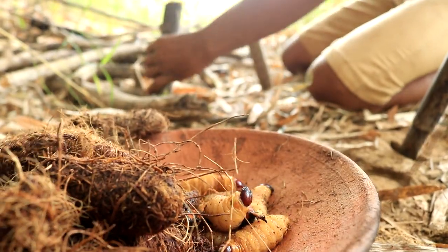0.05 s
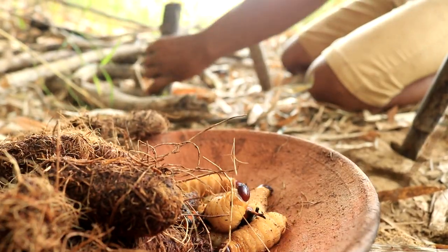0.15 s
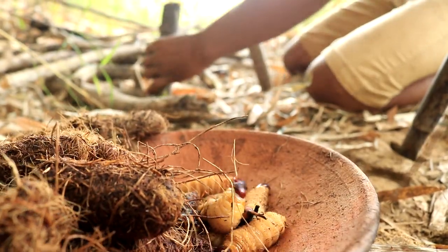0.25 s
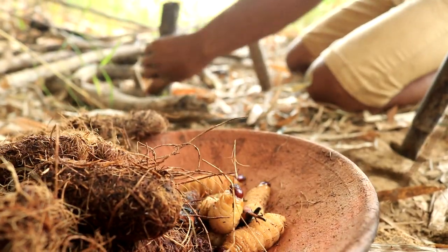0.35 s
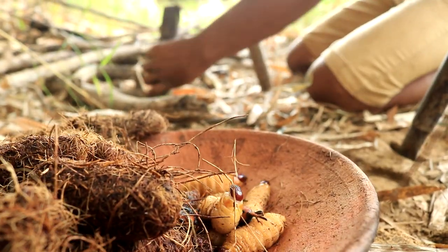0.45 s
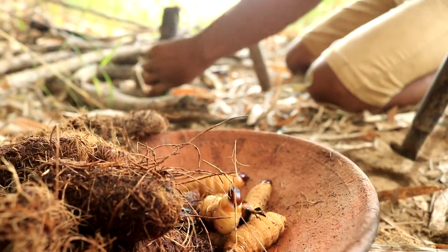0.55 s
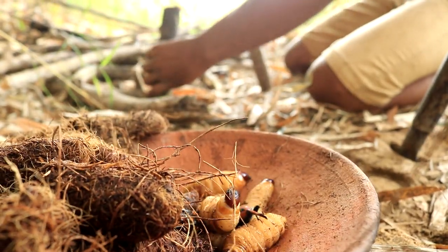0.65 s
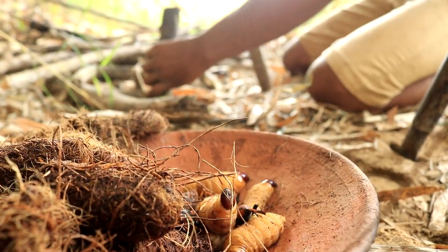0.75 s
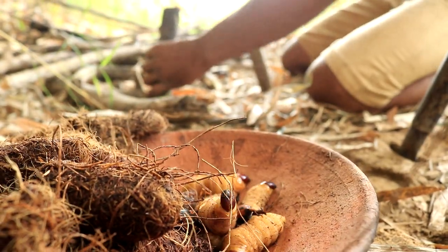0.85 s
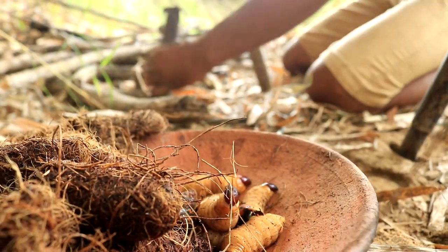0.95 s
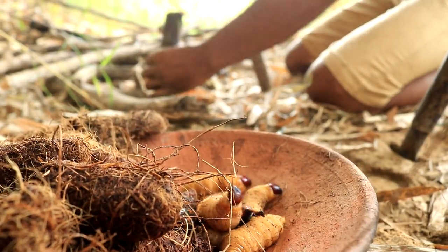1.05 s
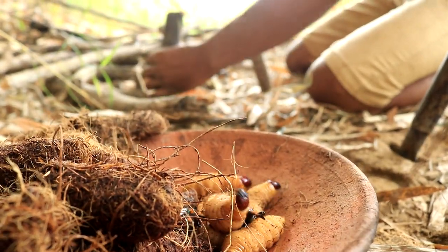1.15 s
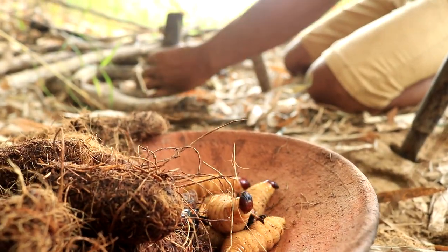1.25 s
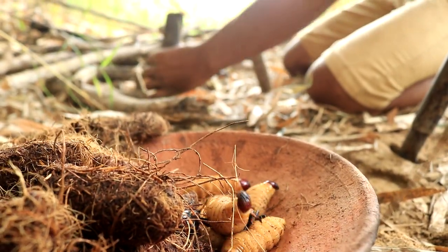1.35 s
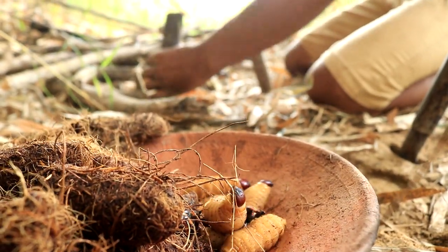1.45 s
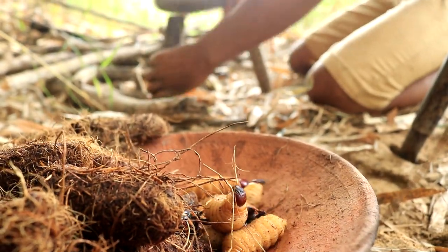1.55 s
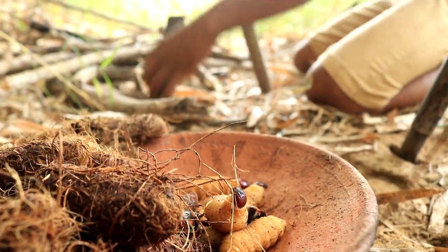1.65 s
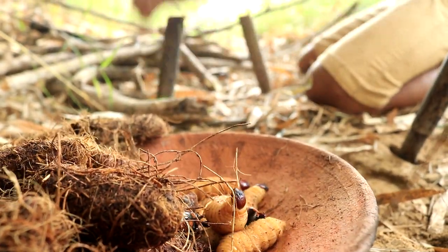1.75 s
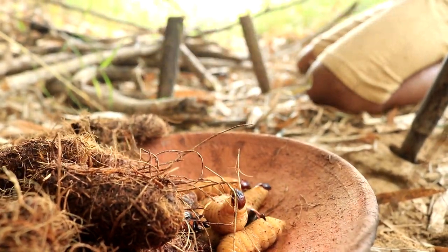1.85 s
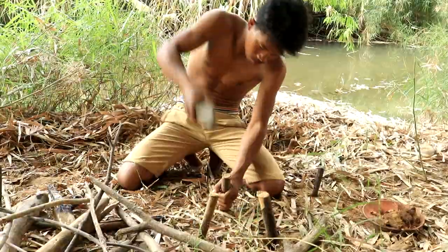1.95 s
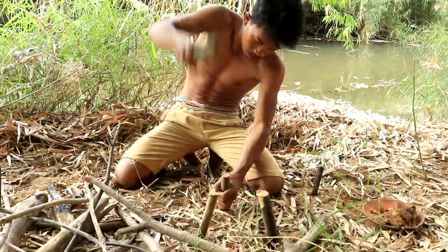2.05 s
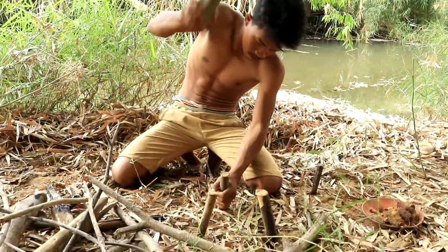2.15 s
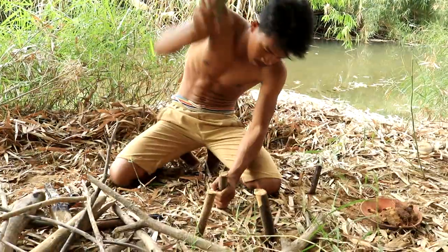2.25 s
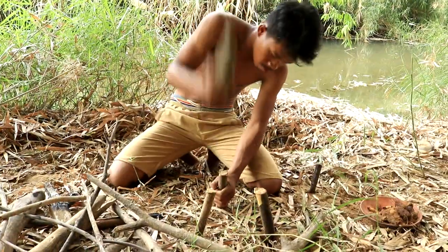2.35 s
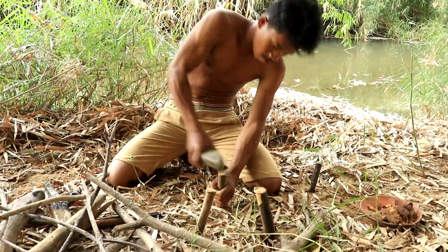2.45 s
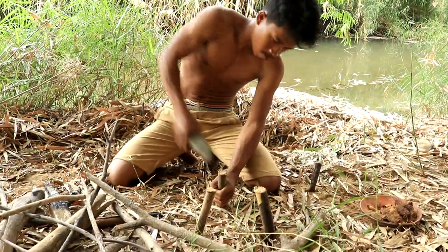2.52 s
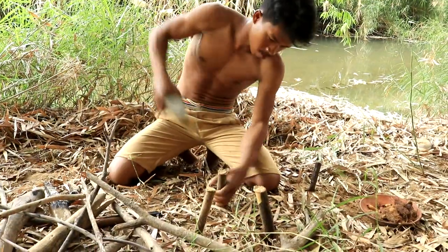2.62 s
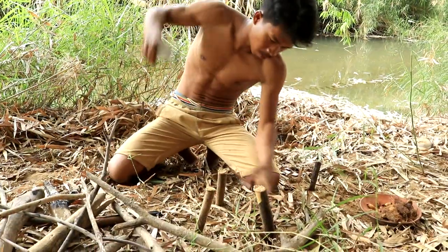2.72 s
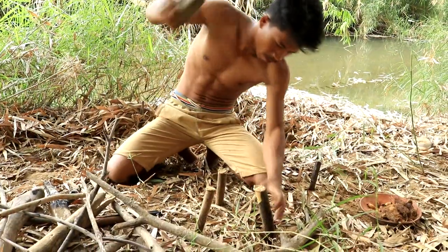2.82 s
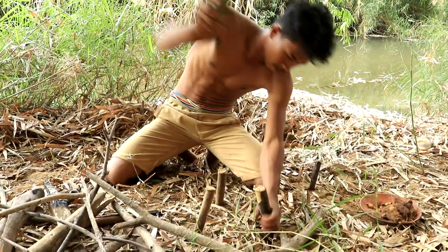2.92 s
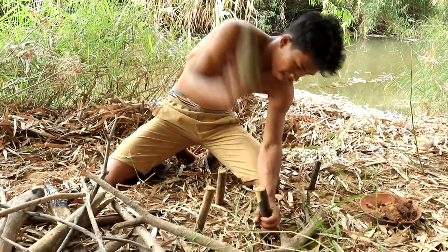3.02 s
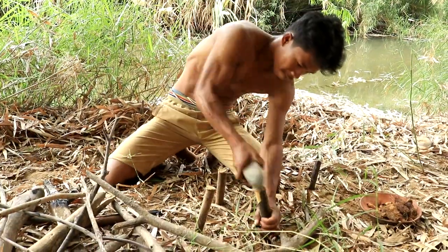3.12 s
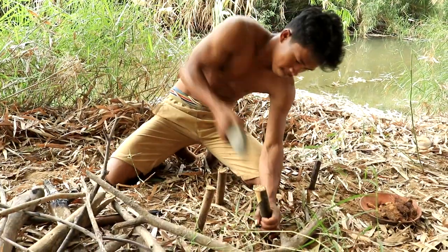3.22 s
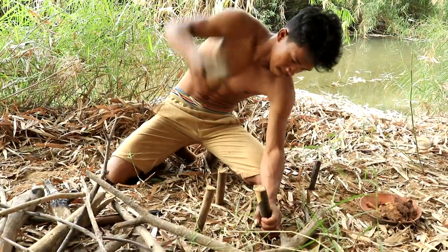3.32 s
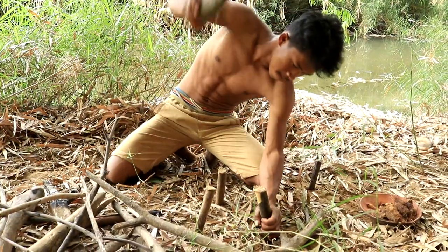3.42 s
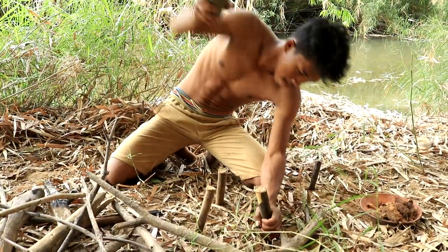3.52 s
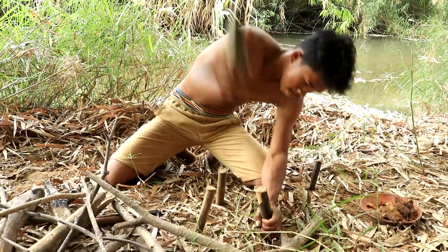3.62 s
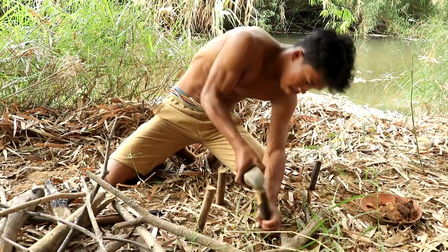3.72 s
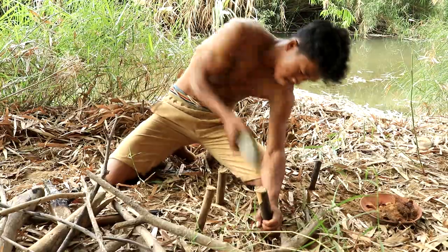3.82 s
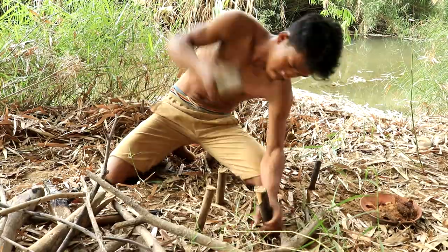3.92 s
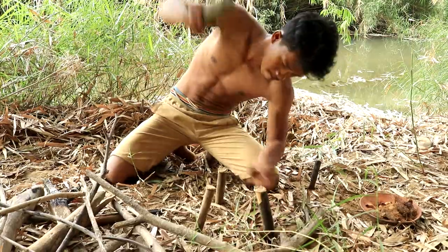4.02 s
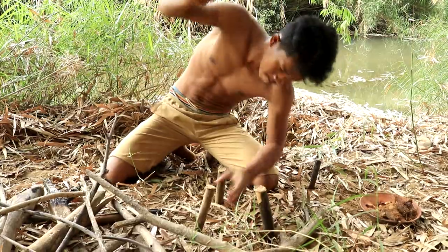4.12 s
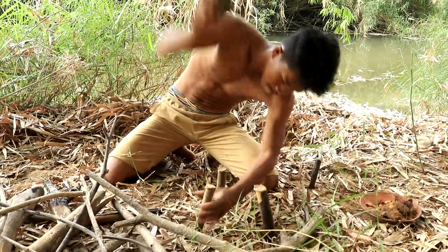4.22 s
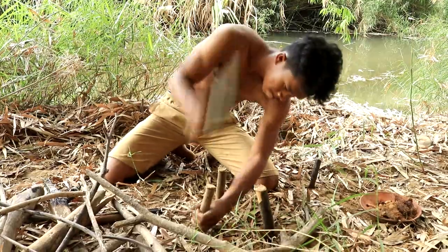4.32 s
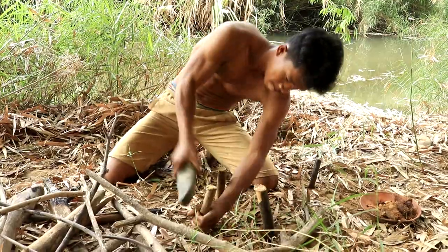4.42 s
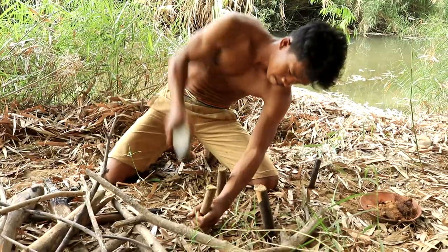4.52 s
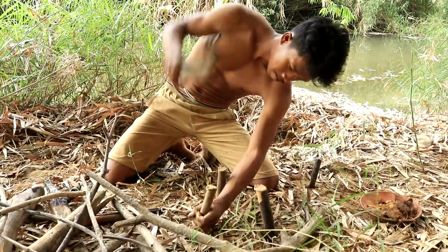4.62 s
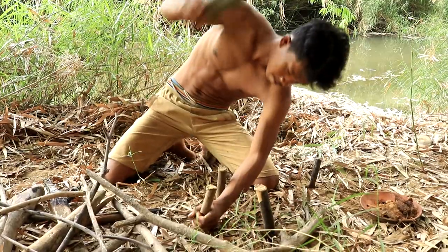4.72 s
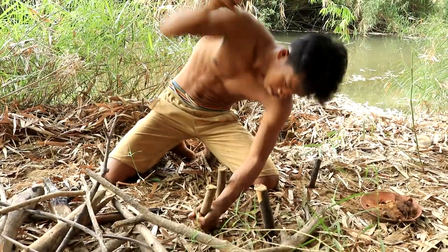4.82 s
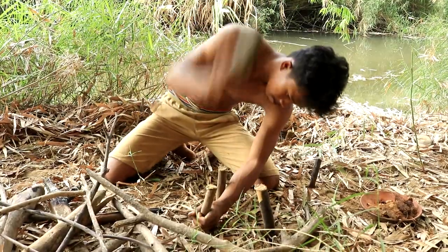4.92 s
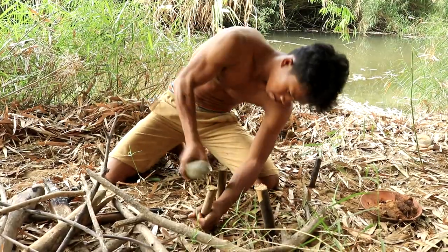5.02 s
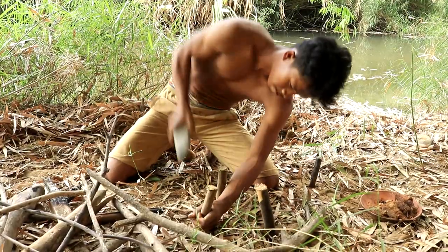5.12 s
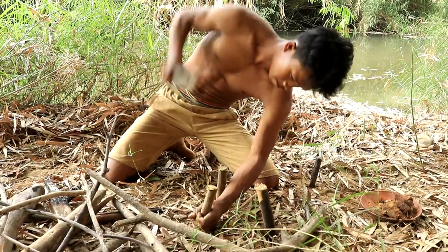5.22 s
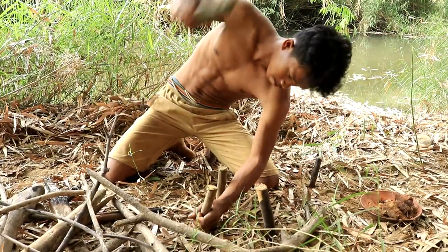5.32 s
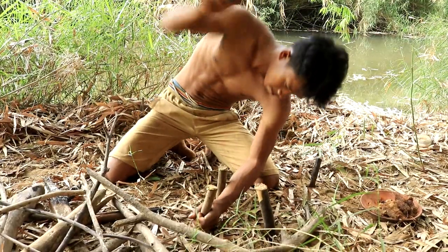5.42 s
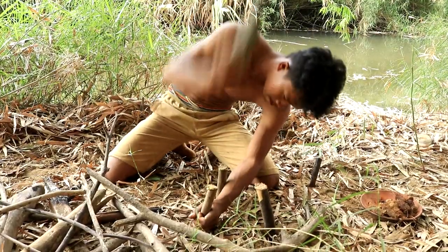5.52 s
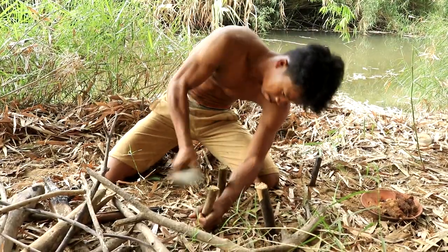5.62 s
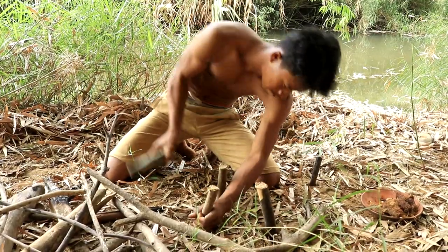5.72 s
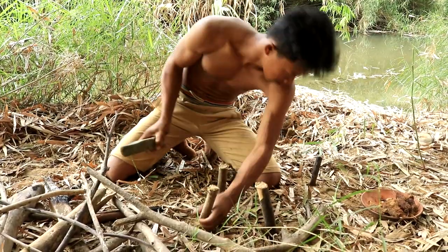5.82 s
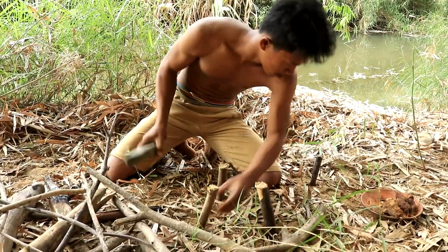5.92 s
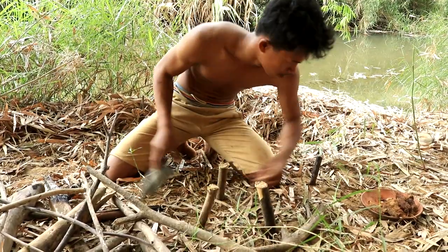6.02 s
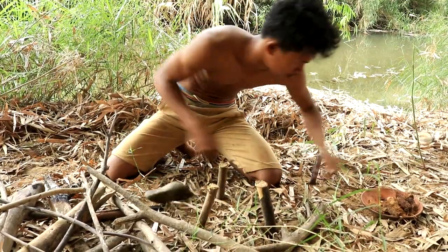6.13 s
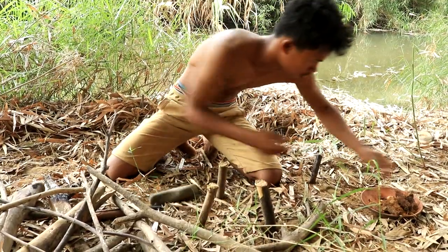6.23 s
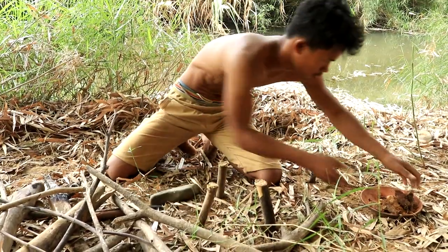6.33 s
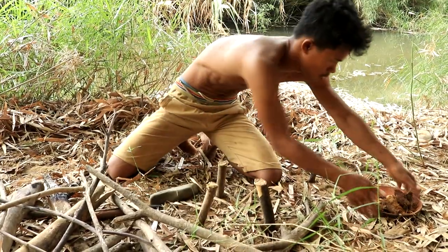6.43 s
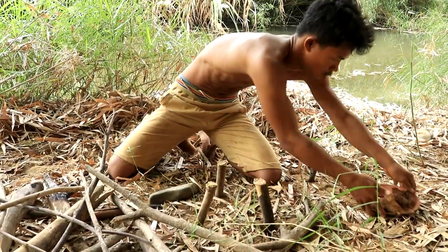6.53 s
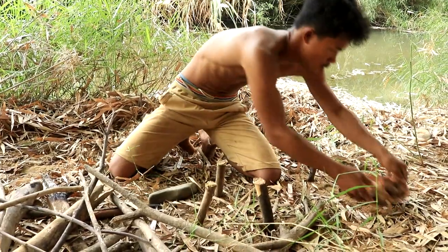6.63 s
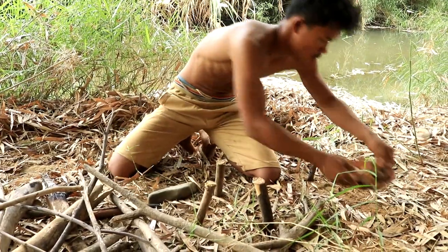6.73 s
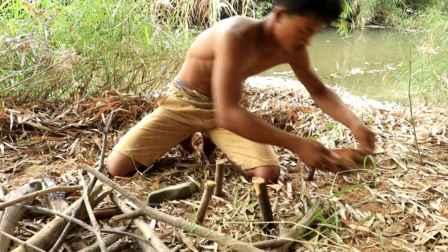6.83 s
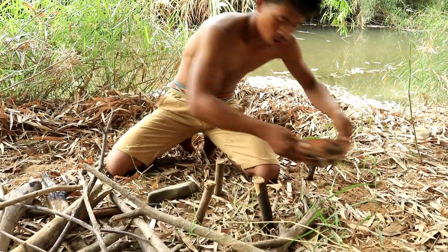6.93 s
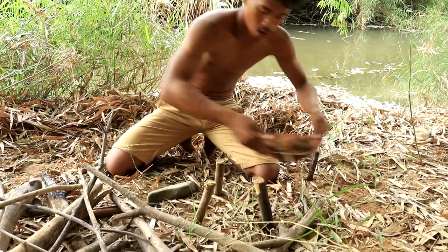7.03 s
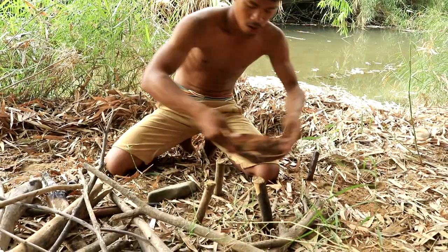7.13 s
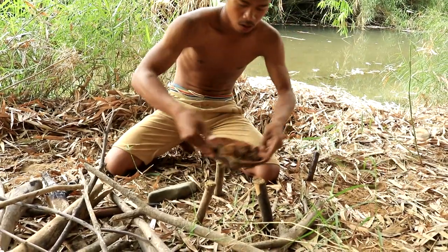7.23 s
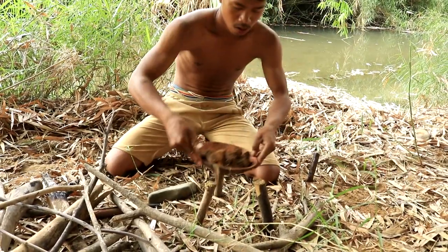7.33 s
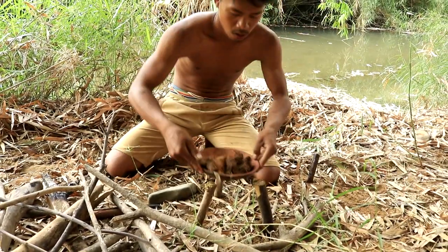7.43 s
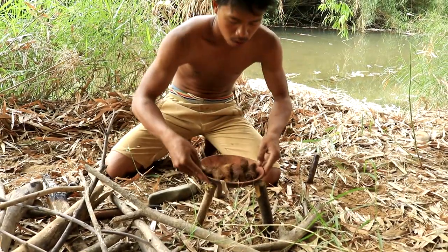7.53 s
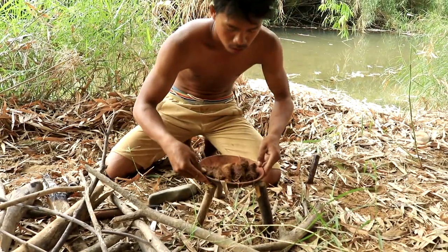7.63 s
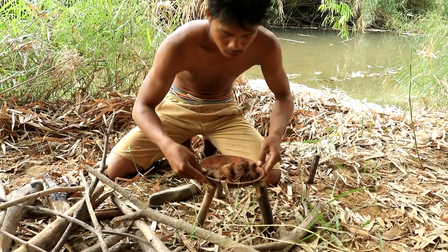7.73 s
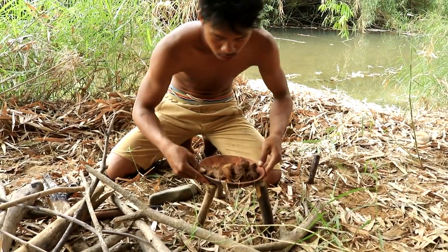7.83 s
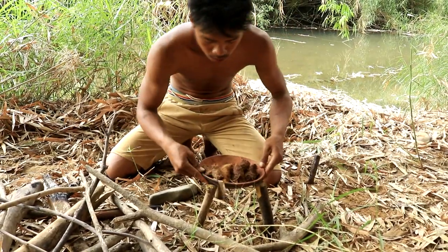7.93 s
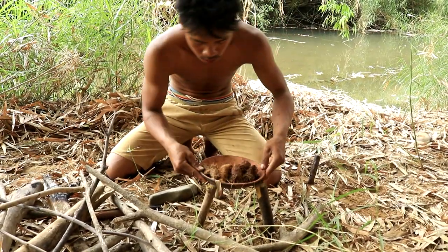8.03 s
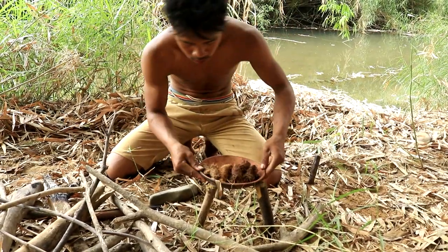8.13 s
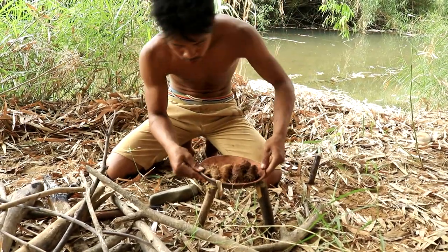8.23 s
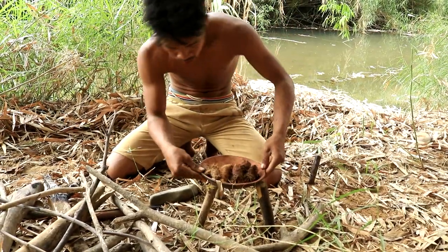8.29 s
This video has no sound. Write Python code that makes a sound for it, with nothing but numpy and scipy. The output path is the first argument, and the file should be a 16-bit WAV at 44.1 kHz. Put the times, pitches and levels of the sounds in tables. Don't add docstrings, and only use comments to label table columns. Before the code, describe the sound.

Nine heavy stone blows on wooden stakes, very close and distorted, with leaf crackle, cricket drone, and finally a clay bowl scraping on wood.

```python
import sys
import numpy as np
from scipy import signal
from scipy.io import wavfile

SR = 44100
rng = np.random.default_rng(int(sys.argv[2]) if len(sys.argv) > 2 else 0)


def volts(x):
    e = np.asarray(x, float) / 20
    return 10 ** e


def bounce(signal):
    frames = np.transpose(np.atleast_2d(signal))
    limited = np.clip(frames, -1, 1)
    pcm = np.round(limited * 32767).astype(np.int16)
    wavfile.write(sys.argv[1], SR, pcm)


N = 368676

# f/Hz, correlation
LIKENESS = [(60, 1), (180, 0.63), (550, 0.35), (1650, 0.27), (4970, 0.077), (15000, -0.27)]
# f/Hz, density/dB per Hz
HUSH_COLOUR = [(200, -33), (300, -11.5), (500, -14), (900, -18.5), (1500, -17.5), (2500, -22.5),
               (4000, -23), (5200, -49), (6500, -25.5), (8500, -16), (11000, -29), (14000, -39),
               (16000, -40)]
# f/Hz, density/dB per Hz
RUMBLE_COLOUR = [(22, -1), (35, -10.5), (55, 3), (75, -2.5), (105, -0.5), (150, -10.5), (220, -13)]
RUMBLE_DB = -37.5, -41
# t/s, length/s, level/dB, start f/Hz
BIRD = [
    (6.6, 0.19, -47, 1580),
    (6.793, 0.12, -47, 1400),
    (7.425, 0.18, -47.5, 1300),
]
# f/Hz, width/Hz, level/dB
NEAR_WINGS = [
    [(7140, 80, 0), (6850, 120, -16), (7120, 330, -6)],
    [(7535, 45, 0), (7800, 100, -24), (7550, 260, -6)],
]
# f/Hz, width/Hz, level/dB
FAR_WING = [(4560, 110, 0)]
FAINT_WING = [(8400, 230, 0)]
# soft level/dB, full level/dB, swell start t/s, swell end t/s (an end before
NEAR_SONGS = [
    (-51, -44.5, 2.18, 1.88),
    (-57, -46.5, 2.5, 2.7),
]
# t/s, length/s, level/dB
FAR_PHRASES = [(0.0, 0.058, -34), (0.35, 1, -35.5), (1.95, 0.51, -37), (3.25, 1.05, -41),
               (4.55, 0.83, -38.5), (6.45, 1.84, -36.5)]
# peak t/s, swell/s, level/dB, fine against coarse/dB
STIRS = [(0.0, 0.036, -37, -3), (0.054, 0.045, -37.5, -11), (0.175, 0.063, -39, 1.5), (0.5, 0.28, -42, -9),
         (0.74, 0.15, -57, 15), (1.09, 0.15, -35, -17), (1.183, 0.0085, -29, -32),
         (1.314, 0.0052, -30.5, 1), (1.5, 0.15, -47, -7), (1.68, 0.13, -41, 6), (1.86, 0.24, -37.5, -4.5),
         (2.15, 0.21, -43, -5), (2.35, 0.18, -36.5, -2.5), (2.706, 0.24, -41, -5.5), (2.97, .15, -34.5, -6),
         (3.22, 0.094, -40, -13), (3.42, 0.18, -47.5, -4), (3.61, 0.069, -44, -6), (3.83, 0.16, -37, -11),
         (4.03, 0.13, -43.5, -12), (4.35, 0.15, -43, -5), (4.895, 0.075, -43, -5), (5.17, 0.13, -47, -8),
         (5.85, 0.32, -41.5, -6), (6.131, 0.049, -26, -6), (6.19, 0.078, -30.5, 3),
         (6.27, 0.035, -34.5, -4), (6.48, 0.18, -34.5, -2), (7.54, 0.06, -36, -6.5), (7.95, 0.16, -42, -10)]
# t/s, length/s, level/dB
SHIFTING = [(1.62, 0.56, -53.5), (5.75, .14, -50), (5.905, 0.013, -37), (6.2, 0.11, -49.5),
            (6.47, 0.056, -47.5), (6.6, 0.23, -53), (7.48, 0.11, -45.5)]
# t/s, peak level/dB, f/Hz, left against right/dB
SNAPS = [(0.291, -28, 8180, -16), (0.339, -28, 10800, -9), (0.7013, -27, 12700, 6), (1.3123, -30, 9000, -9),
         (1.4416, -28.5, 8400, -11), (1.4591, -25, 11700, -8), (1.475, -29, 12400, -12),
         (1.7559, -34, 10800, -11), (2.5104, -13, 9700, -7), (6.1485, -8, 11500, -0.5),
         (6.1924, -11, 10900, -1.0), (6.804, -25, 8300, -10), (6.9765, -29, 8230, 3)]
# t/s, peak level/dB, f/Hz, left against right/dB
TAPS = [(0.176, -23, 1700, -1.5), (0.555, -27, 1530, 2), (1.16, -23, 4550, -6), (1.18, -16.5, 4340, -14),
        (1.352, -27.5, 2420, -9), (2.008, -28, 1720, -6), (3.01, -13.5, 1550, -4),
        (3.056, -26.5, 1450, -14), (4.197, -33, 2870, 0.0), (4.888, -25, 4200, 4),
        (5.473, -26.5, 2570, -11), (6.446, -25, 1500, -6), (7.518, -24, 3170, -6), (7.54, -22, 2540, -5),
        (7.656, -36, 2960, -1.0), (7.924, -22, 3140, -6), (8.21, -24.5, 870, 3), (5.893, -33, 900, 0)]
# t/s, length/s, level/dB
SCRAPES = [
    (7.535, 0.02, -34.5),
    (7.85, .06, -46.5),
    (7.924, .13, -33.5),
]
# t/s, length/s, level/dB
ROCKS = [
    (0.0, .015, -37),
    (0.045, 0.022, -41.5),
    (0.72, 0.041, -37.5),
]
# f/Hz, width/Hz, level/dB
HELD_BOWL = [(1910, 30, -2), (2430, 33, -4), (2840, 32, -1), (3120, 60, 0), (3760, 110, -7),
             (4130, 80, -14), (5390, 50, -15)]
RESTING_BOWL = [(2480, 24, 3), (3170, 43, -2), (3800, 37, -2), (4940, 50, -10), (1880, 80, -16)]
# f/Hz, width/Hz, level/dB
TREE_ECHO = [(1130, 330, 3.5), (1540, 450, 0.5), (1960, 520, -4)]
# t/s, thud level/dB, thud f/Hz, tick level/dB
THUDS = [(0.457, -13, 162, -17), (1.02, -11, 327, 1), (1.022, -3.5, 145, -14), (2.5113, -3, 190, -6),
         (3.162, -5, 265, -4.5), (3.162, -5, 154, -28), (3.7736, -4.5, 448, -3), (4.069, -32, 240, -47),
         (5.914, -40, 400, -32), (6.102, -1, 172, -8), (7.538, -27, 214, -27), (8.208, -21.5, 404, -50),
         (8.225, -28, 490, -38)]
# t/s, crack level/dB, soil wave level/dB, knock level/dB, leaf shower level/dB
BLOWS = [
    (0.4005, 32.5, 13, 20.5, -12.5),
    (0.977, 23.5, 14.5, 14.5, -10.5),
    (1.5297, 18.5, 17, 13, -18.5),
    (2.4600, 16, 18.5, 1.5, -20),
    (3.1321, 9.5, 9, -2, -21),
    (3.7394, 18, 10, 10, -17.5),
    (4.3970, 15.5, 8, 11, -23.5),
    (5.0275, 17, 9, 7.5, -22),
    (5.632, 19, 8.5, 9, -18.5),
    (6.084, 14, -16, -15, -13.5),
]
# crack decay/s, brightness/dB per octave
CONTACTS = [(0.0015, 0), (0.0025, 1.5), (0.0035, -0.5), (0.002, -4.5), (0.0059, -0.5), (0.003, -2.5),
            (0.0021, -1), (0.0019, 1.5), (0.002, 2.5), (0.0025, -2)]
# soil wave f/Hz, knock f/Hz, after-ring level/dB, shower peak after blow/s
TARGETS = [
    (107.4, 473, -5.5, 0.018),
    (134, 400, -7.5, 0.017),
    (125.8, 266, -3.5, 0.017),
    (128.7, 245, -8, 0.018),
    (140, 1030, -19, 0.01),
]
NEXT_TARGET_S = [1.9, 2.8, 4.1, 5.9]
# f/Hz, width/Hz, level/dB
STAKE = [(729, 142, 4), (1137, 300, 1.5), (1573, 110, -2), (1930, 480, -4.5), (3074, 600, 0),
         (3750, 370, -4), (5720, 2200, -11), (8300, 3300, -12), (11500, 3600, -18)]
WAVE_SHAPE = (1.241, 0.44), (1.334, 0.42)
# f/Hz, level/dB, t60/s, delay/s, first swing up + or down -
SOIL = [
    [(53.3, 1, 0.14, 0.0258, 1), (109.4, -1.5, 0.13, .0245, -1)],
    [(68.5, -5.5, 0.16, 0.021, -1), (154.5, -2, 0.088, .0262, -1)],
]
# f/Hz, width/Hz, level/dB
SHOWER = [
    [(360, 130, 8), (1060, 820, 6.5), (1550, 600, 9.5), (3120, 1300, 0)],
    [(5600, 2900, 7), (7300, 3300, 9.5), (11900, 4400, 2)],
]

MOVED_AT_S = 1.9
HUSH_DB = -40.5
SHAKEN_DB, SHAKEN_S = 11.5, 0.081
BIRD_SAG_HZ_PER_S, BIRD_OCTAVE_DB = 494, -3
PHRASE_EDGE_S, SONG_WANDER_DB, PURE_SHARE = 0.13, 2.5, 0.45
STIR_RANGE_DB, SETTLE_RATIO = 17, 0.94
LITTER_DB, LITTER_FINE_DB, LITTER_WANDER_DB = -58, -57, 3
SHIFT_EDGE_S, SCRAPE_EDGE_S = 0.049, 0.0082
SCATTER_DB, SCATTER_AFTER_S, SCATTER_SPREAD_S = -11.5, 0.032, 0.019
LOW_CRACK_HZ = 900
LEFT_LATE_S = 0.00018
SINK_HZ_PER_S = 1.9
FINE_SHOWER_DB = -6
CUTOFF_HZ = 15850


def at_hz(points, hz):
    known_hz, value = np.transpose(points)
    return np.interp(np.log(hz), np.log(known_hz), value)


def rms_one(x):
    return x / np.sqrt(np.mean(x ** 2) + 1e-20)


def drift(rate):
    knots = int(N / SR * rate) + 2
    return np.interp(np.linspace(0, knots - 1, N), np.arange(knots), rng.standard_normal(knots))


def band(x, low_hz, high_hz):
    edges = [low_hz, min(high_hz, 0.45 * SR)]
    return signal.sosfilt(signal.butter(2, edges, "band", fs=SR, output="sos"), x)


def resonate(x, modes):
    out = 0
    for k, (hz, width, db) in enumerate(modes):
        r = np.exp(-np.pi * width / SR)
        feed = [(1 - r * r) / 2, 0, (r * r - 1) / 2]
        ring = [1, -2 * r * np.cos(2 * np.pi * hz / SR), r * r]
        out = out + (-1) ** k * volts(db) * signal.lfilter(feed, ring, x + 1e-18)
    return out


def add(out, s, piece):
    i = round(s * SR)
    out[..., i:i + piece.shape[-1]] += piece[..., :N - i]


def banded_noise(spectrum, patchy_db):
    mid_side = np.zeros((2, N))
    octaves = np.log2(spectrum[-1][0] / spectrum[0][0])
    edges = spectrum[0][0] * 2 ** np.arange(0, octaves + 0.5, 0.5)
    white = rng.standard_normal((2, 2, N))
    for k, (low, high) in enumerate(zip(edges, edges[1:])):
        centre = np.sqrt(low * high)
        alike = np.clip(at_hz(LIKENESS, centre), -1, 1)
        gain = volts(at_hz(spectrum, centre) + patchy_db * drift(10))
        mid_side += gain * band(white[k % 2] * np.sqrt([[1 + alike], [1 - alike]]), low, high)
    mid, side = mid_side
    return rms_one(np.array([mid + side, mid - side]))


def grains(per_s, spread_db):
    sizes = volts(spread_db * np.minimum(rng.exponential(1, N), 4))
    sizes = sizes * (rng.random(N) < per_s / SR)
    return rms_one(sizes * rng.standard_normal((2, N)))


def while_moving(rows, edge_s):
    t = np.arange(N) / SR
    levels = []
    for s, length, db in rows:
        outside_s = np.maximum(s - t, t - s - length)
        levels.append(db - 20 * np.clip(outside_s / edge_s, 0, 5))
    return volts(np.max(levels, axis=0))


def hush():
    return volts(HUSH_DB) * banded_noise(HUSH_COLOUR, patchy_db=1.5)


def rumble():
    t = np.arange(N) / SR
    shaken = sum((t > blow[0]) * np.exp(-np.abs(t - blow[0]) / SHAKEN_S) for blow in BLOWS)
    level_db = np.where(t < MOVED_AT_S, *RUMBLE_DB) + SHAKEN_DB * shaken
    return volts(level_db + 1.5) * banded_noise(RUMBLE_COLOUR, patchy_db=3.0)


def bird():
    out = np.zeros(N)
    for s, length, db, hz in BIRD:
        t = np.arange(round(length * SR)) / SR
        waver_hz = 40 * drift(45)[round(s * SR):][:len(t)]
        turn = 2 * np.pi * np.cumsum(hz - BIRD_SAG_HZ_PER_S * t + waver_hz) / SR
        voice = np.sin(turn) + volts(BIRD_OCTAVE_DB) * np.sin(2 * turn)
        add(out, s, volts(db) * np.sin(np.pi * t / length) * voice)
    return out * volts(3.5 * drift(40))


def throbbing(per_s, depth):
    turn = np.cumsum(per_s * (1 + 0.01 * drift(2))) / SR
    return 1 - depth * (1 - np.cos(np.pi * turn) ** 4)


def stridulate(wings, throb, pure):
    wing_hz = wings[0][0]
    teeth = rng.standard_normal((3, N))
    song = resonate(0.34 * teeth[0] + teeth[1:], wings)
    scraped = rms_one(band(song, wing_hz - 330, wing_hz + 300))
    turn = 2 * np.pi * np.cumsum(wing_hz + 45 * drift(40)) / SR
    tone = np.sin(turn + np.array([[0], [1.2]]))
    return rms_one(throb * (scraped + pure * np.sqrt(2) * tone))


def crickets():
    near, far = throbbing(45.1, depth=0.56), throbbing(69, depth=0.45)
    out = np.zeros((2, N))
    for (soft_db, full_db, start, end), wings, lift_db in zip(NEAR_SONGS, NEAR_WINGS, (3.0, 3.5)):
        level_db = np.interp(np.arange(N) / SR, [start, end], [soft_db, full_db])
        level_db = level_db + SONG_WANDER_DB * drift(3)
        out += volts(level_db + lift_db) * stridulate(wings, near, PURE_SHARE)
    phrases = while_moving(FAR_PHRASES, PHRASE_EDGE_S) * volts(-14.5)
    out += phrases * stridulate(FAR_WING, far, PURE_SHARE)
    return out + volts(-57.5) * stridulate(FAINT_WING, far, 0)


def leaves():
    t, wander = np.arange(N) / SR, volts(LITTER_WANDER_DB * drift(4.7))
    coarse_gain, fine_gain = volts(LITTER_DB) * wander, volts(LITTER_FINE_DB) * wander
    for s, swell_s, db, fine_db in STIRS:
        first = max(round((s - 3 * swell_s) * SR), 0)
        away = (t[first:round((s + 5 * swell_s) * SR)] - s) / swell_s
        gain = volts(db - STIR_RANGE_DB * np.maximum(-away, away / SETTLE_RATIO))
        add(coarse_gain, first / SR, gain)
        add(fine_gain, first / SR, gain * volts(fine_db))
    crackle = grains(9000, spread_db=2.2) * volts(2.5 * drift(30))
    coarse = rms_one(band(crackle, 347, 7870))
    fine = rms_one(band(crackle, 5500, 15000))
    return volts(3.5) * coarse_gain * coarse + volts(4.0) * fine_gain * fine


def shifting():
    scuff = rms_one(band(grains(1500, spread_db=6.5), 166, 700))
    return while_moving(SHIFTING, SHIFT_EDGE_S) * volts(5.0) * scuff


def snaps():
    out, t = np.zeros((2, N)), np.arange(SR // 30) / SR
    for s, db, hz, pan_db in SNAPS + TAPS:
        burst = rng.standard_normal(len(t)) * np.exp(-t / 0.001)
        ring = resonate(burst, [(hz, 60 + hz / 14, 0), (min(2.1 * hz, 15000), hz / 8, -5)])
        snap = 0.3 * band(burst, hz / 3, hz * 3) + 5 * ring
        pan = volts([[pan_db / 2], [-pan_db / 2]])
        add(out, s, volts(db) * snap / np.abs(snap).max() * pan)
    return out


def bowl():
    slips = grains(2500, spread_db=2.5)
    held = while_moving(SCRAPES, SCRAPE_EDGE_S) * rms_one(resonate(slips, HELD_BOWL))
    resting = while_moving(ROCKS, SCRAPE_EDGE_S) * rms_one(resonate(slips, RESTING_BOWL))
    return volts(2.0) * (held + resting)


def scatter():
    t, gain = np.arange(SR // 5) / SR, np.zeros(N)
    landing = np.exp(-0.5 * ((t - SCATTER_AFTER_S) / SCATTER_SPREAD_S) ** 2) * np.minimum(t / 0.013, 1)
    for s, *_, shower_db in BLOWS[:-1]:
        add(gain, s, volts(shower_db + SCATTER_DB) * landing)
    return gain * rms_one(resonate(grains(3000, spread_db=2.0), TREE_ECHO))


def soil_wave(t, hz, arrival, spread, glide):
    cycles = t * hz - arrival
    packet = np.exp(-0.5 * (cycles / spread) ** 2)
    return packet * np.cos(2 * np.pi * (cycles - glide * cycles ** 2)) * (t > 0)


def thuds():
    out, t = np.zeros((2, N)), np.arange(SR // 10) / SR
    for s, thud_db, hz, tick_db in THUDS:
        tick = band(rng.standard_normal((2, len(t))), 520, 3400) * np.exp(-t / 0.0019)
        thud = soil_wave(t, hz, arrival=0.9, spread=0.78, glide=0.13)
        add(out, s, volts(thud_db) * thud + volts(tick_db) * tick)
    return out


def crack(decay_s, tilt_db):
    t = np.arange(SR // 20) / SR
    chatter = rng.standard_normal((3, len(t))) * np.exp(-t / decay_s)
    modes = [(hz, width, db + tilt_db * np.log2(hz / 1500)) for hz, width, db in STAKE]
    apart = signal.sosfilt(signal.butter(2, LOW_CRACK_HZ, "high", fs=SR, output="sos"), chatter[1:])
    sound = resonate(chatter[0] + apart, modes)
    return sound / np.abs(sound).max()


def blows():
    out, coarse, fine = np.zeros((2, N)), np.zeros(N), np.zeros(N)
    t = np.arange(SR // 2) / SR
    ears = t - np.array([[LEFT_LATE_S], [0]])
    times = np.array([blow[0] for blow in BLOWS])
    struck = np.searchsorted(NEXT_TARGET_S, times)
    for (s, crack_db, wave_db, knock_db, shower_db), contact, k in zip(BLOWS, CONTACTS, struck):
        wave_hz, knock_hz, ring_db, peak_s = TARGETS[k]
        wave_hz = wave_hz + SINK_HZ_PER_S * (s - np.mean(times[struck == k]))
        place = int(s > MOVED_AT_S)
        knock = np.sin(2 * np.pi * knock_hz * t) * np.exp(-(t / 0.0061) ** 2)
        wave = soil_wave(ears, wave_hz, *WAVE_SHAPE[place], glide=0.2)
        add(out, s, volts(crack_db) * crack(*contact))
        add(out, s, volts(knock_db) * knock + volts(wave_db) * wave)
        for hz, db, t60, delay, swing in SOIL[place]:
            decay = volts(ring_db + db - 60 * t / t60)
            add(out, s + delay, np.sign(swing) * decay * np.sin(2 * np.pi * hz * ears))
        swell = (t / peak_s) * np.exp(1 - t / peak_s)
        add(coarse, s, volts(shower_db) * swell * np.sqrt(t / 0.058))
        add(fine, s, volts(shower_db + FINE_SHOWER_DB) * swell)
    shaken = grains(12000, spread_db=2.0) * volts(2 * drift(45))
    shaken = shaken + 0.15 * shaken[::-1]
    coarse_litter, fine_litter = (rms_one(resonate(shaken, modes)) for modes in SHOWER)
    return out + coarse * coarse_litter + fine * fine_litter


def scene():
    background = hush() + rumble() + bird() + crickets()
    hands = leaves() + shifting() + snaps() + bowl()
    return background + hands + scatter() + thuds() + blows()


def low_pass(x):
    return signal.sosfilt(signal.butter(12, 17010, fs=SR, output="sos"), x)


def record(dry):
    cut = signal.sosfilt(signal.ellip(10, 0.5, 70, CUTOFF_HZ, fs=SR, output="sos"), dry)
    cut = signal.sosfilt(signal.butter(1, 18, "high", fs=SR, output="sos"), cut)
    return low_pass(np.clip(cut, -0.99, 0.99))


dry = scene()
out = record(dry)
bounce(out)
```